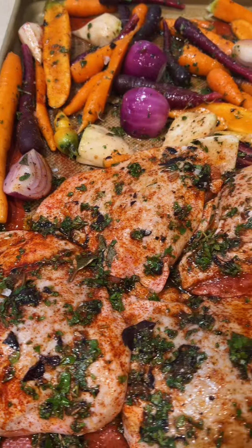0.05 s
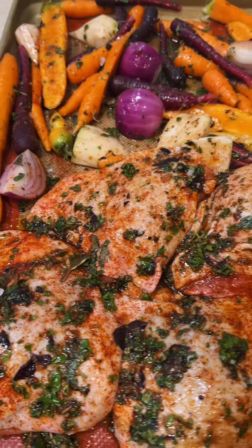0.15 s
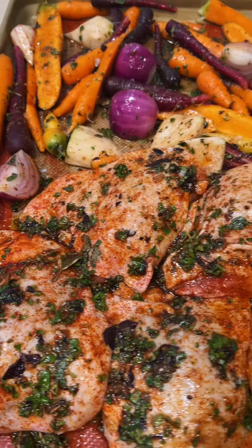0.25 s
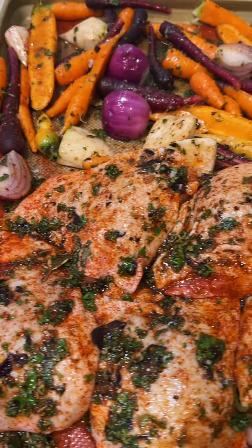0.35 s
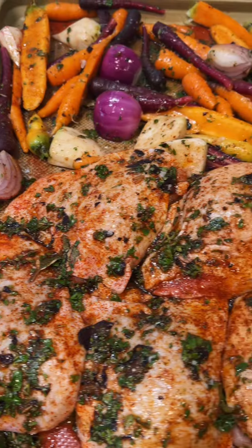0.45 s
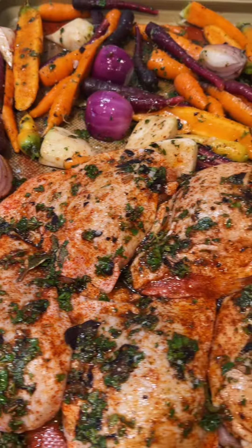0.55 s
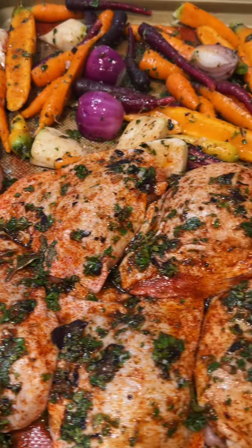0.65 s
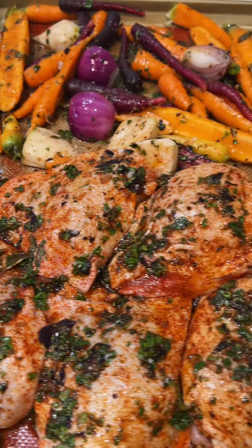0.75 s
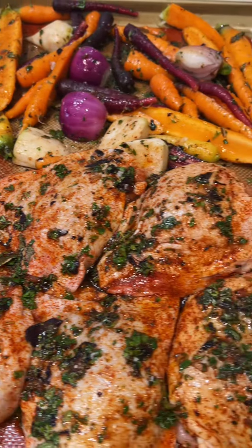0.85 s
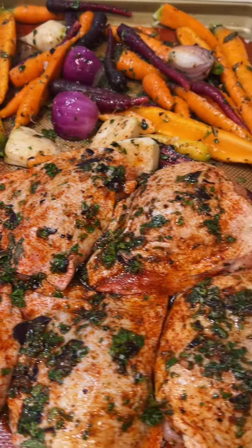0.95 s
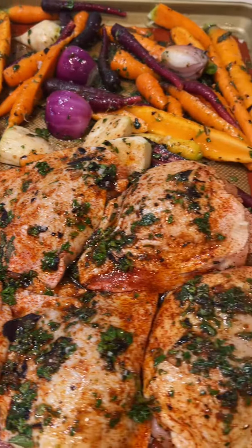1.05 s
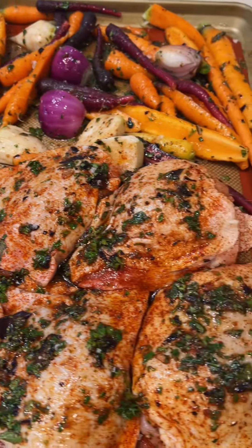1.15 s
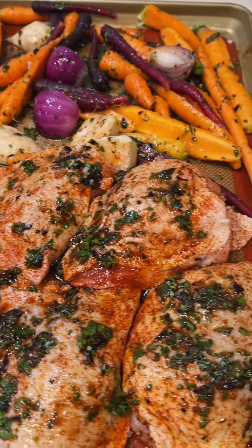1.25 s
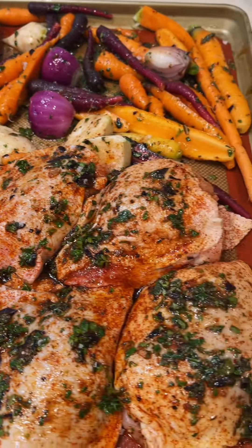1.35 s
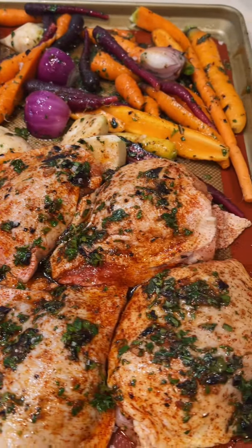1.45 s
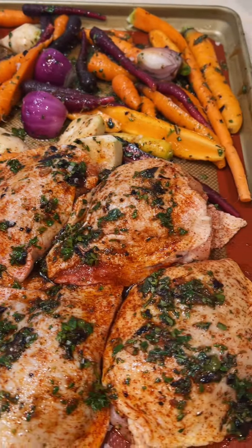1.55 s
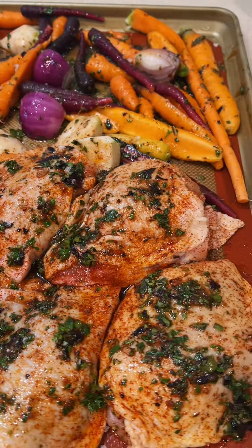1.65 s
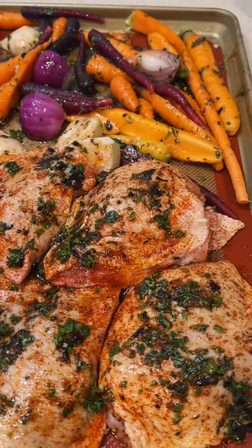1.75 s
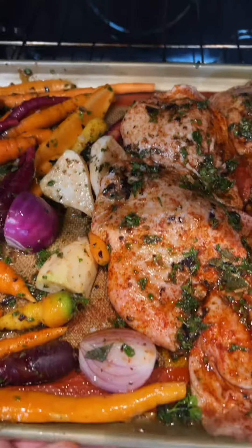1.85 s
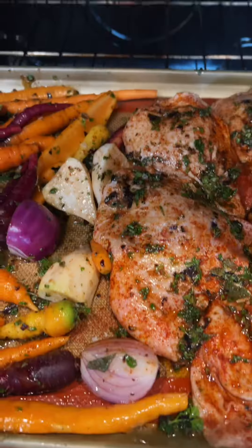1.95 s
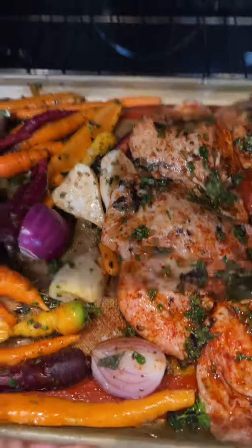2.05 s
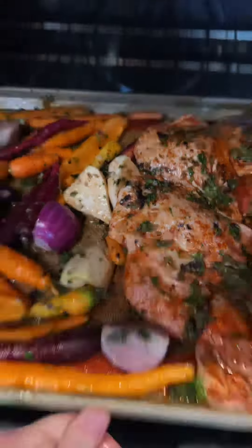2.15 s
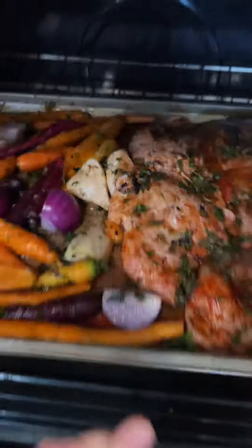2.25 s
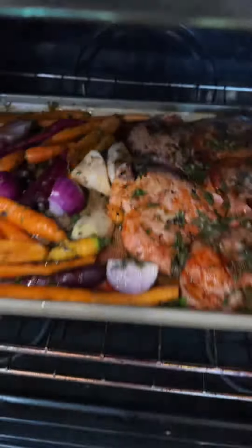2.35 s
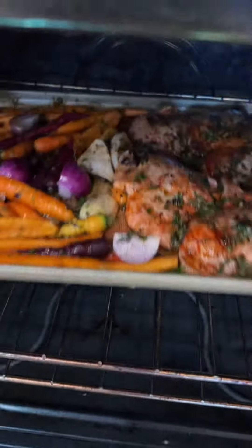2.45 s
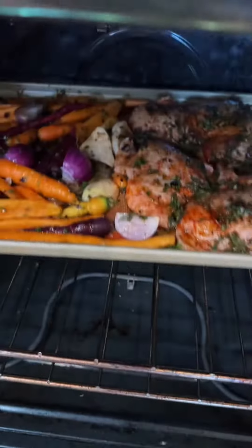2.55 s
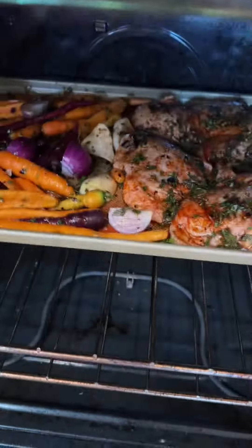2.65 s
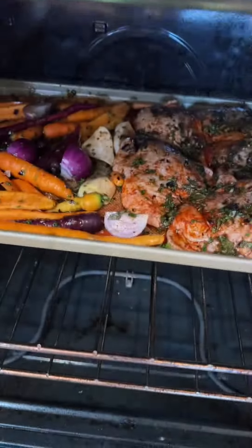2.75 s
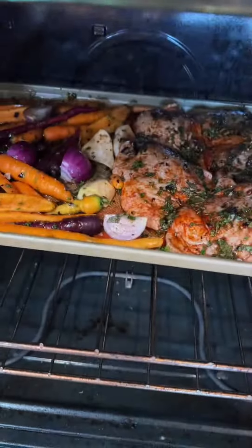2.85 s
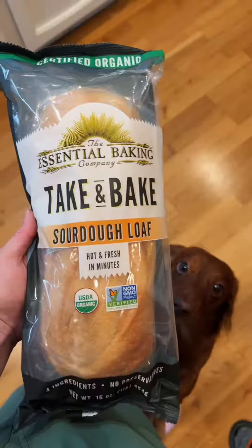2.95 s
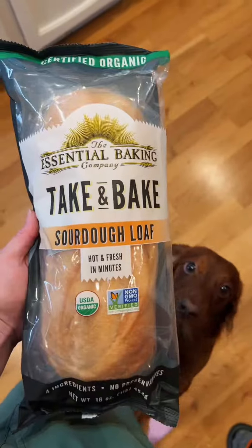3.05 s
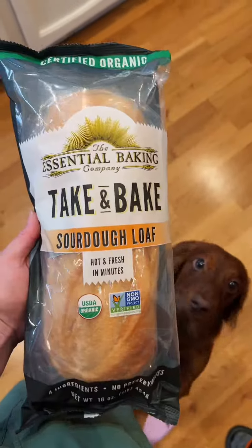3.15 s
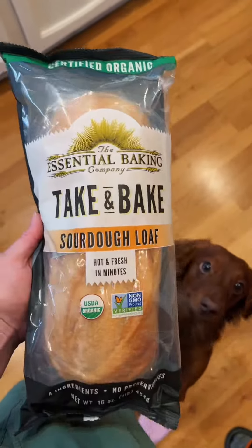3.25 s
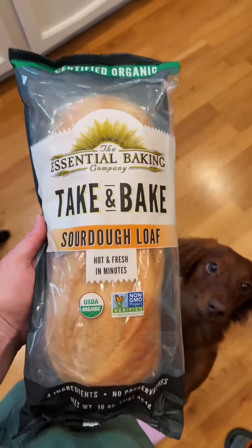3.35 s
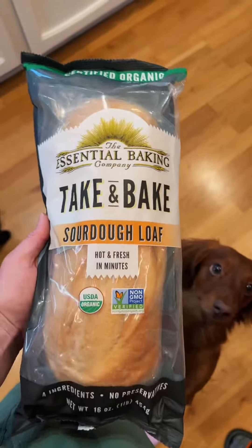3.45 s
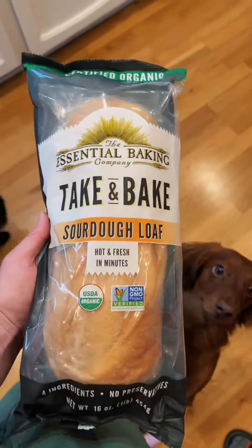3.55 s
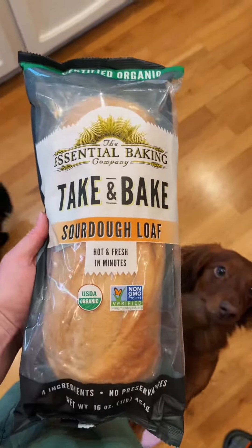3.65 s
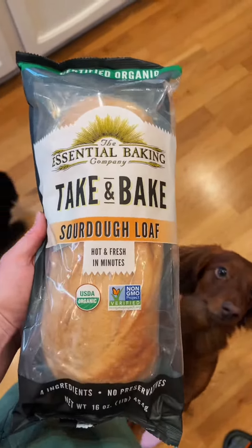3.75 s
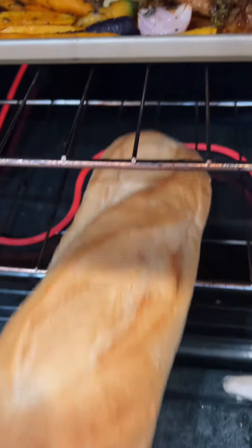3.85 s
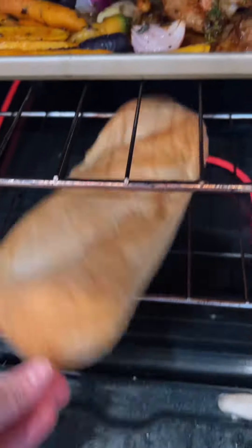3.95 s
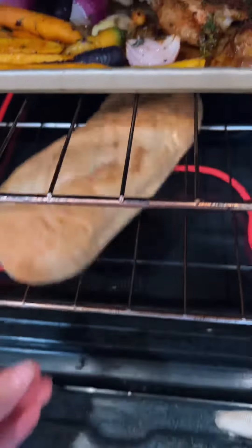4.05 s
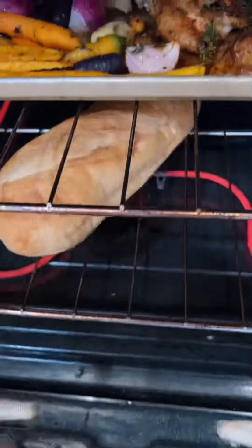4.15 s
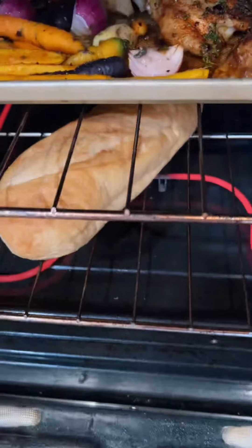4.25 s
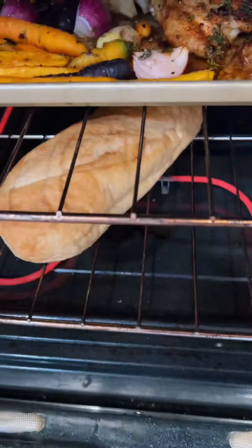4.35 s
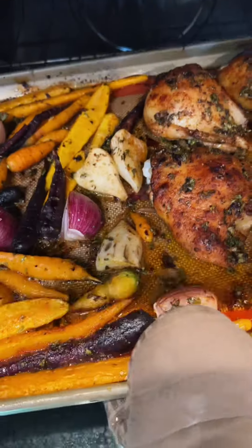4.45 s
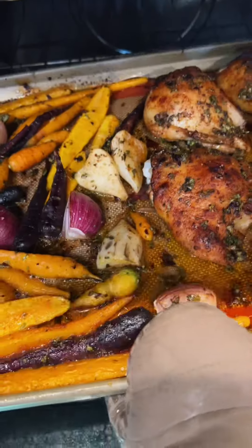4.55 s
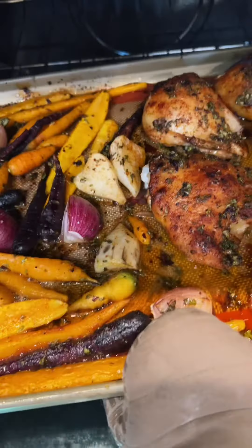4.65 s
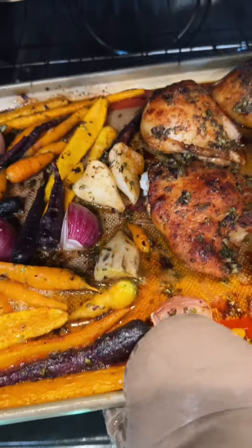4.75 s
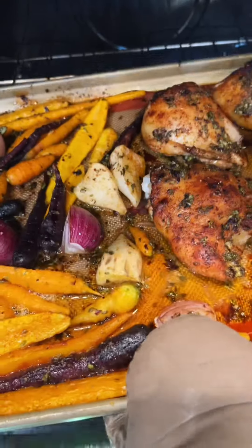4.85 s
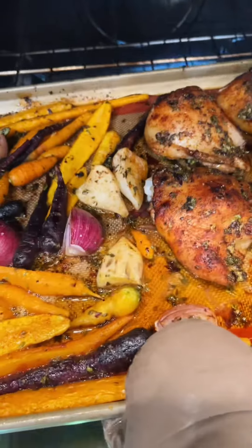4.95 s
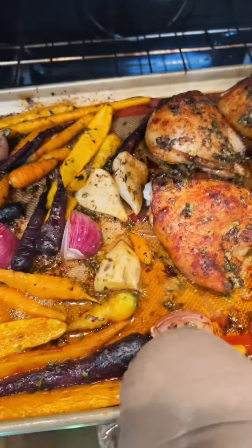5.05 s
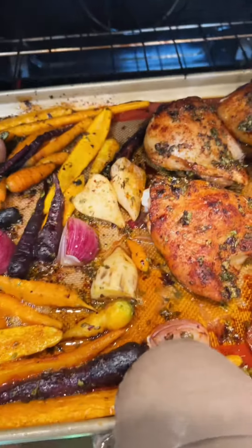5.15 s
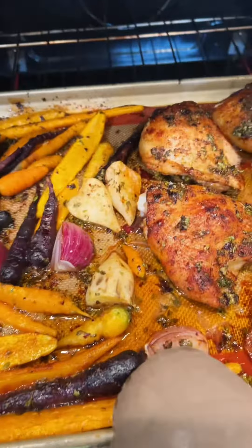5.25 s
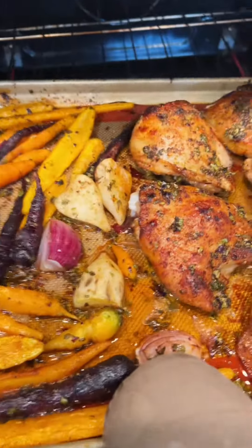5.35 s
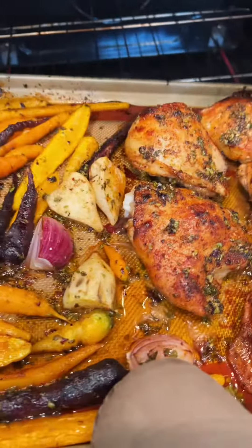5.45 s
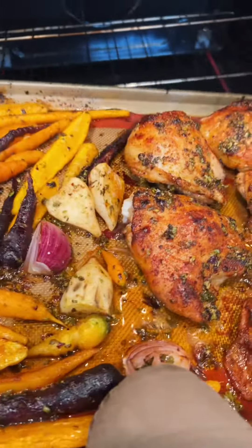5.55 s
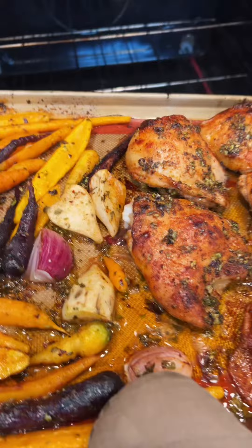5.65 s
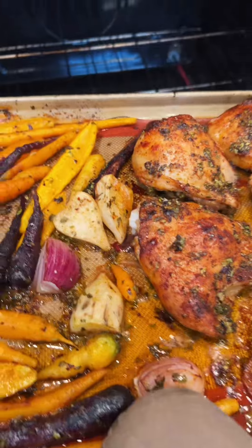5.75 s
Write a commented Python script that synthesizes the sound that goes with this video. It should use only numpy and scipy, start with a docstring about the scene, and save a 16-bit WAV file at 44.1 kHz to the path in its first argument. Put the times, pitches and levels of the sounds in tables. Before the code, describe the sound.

Five short home-kitchen shots, cut hard with small silences. From 0 to 1.77 s a very quiet low appliance hum and soft fan rush grow slightly nearer, with faint dry handling ticks around 0.6, 0.85 and 1.6 s. From 1.96 to 2.9 s room air jumps up: a loaded sheet pan grinds along oven wires, knocks at 2.18, then bangs hardest in a cluster at 2.48-2.75, with boxy steel ring, low thumps and a closing scrape. From 3.1 to 3.8 s a plastic bag gives one soft swish, then faint finger rubbing. From 3.83 to 4.39 s a small squeak leads into a rapid bright wire-rack clatter, loudest near 3.93-4.0, over hissing fat. From 4.56 to 5.8 s steady bubbling sizzle continues while the rack drags out, rumbling, with jerks and metallic squeaks at 5.0-5.4, then sputters and thin steam whistles until the abrupt end.

```python
"""A home kitchen in five short shots with silence between. An appliance hums; a loaded sheet pan grinds onto
the oven rack and knocks home; a plastic bread bag swishes; the wire rack clanks in a quick run over sizzling
fat; the rack with the hot pan is dragged out in squeaky jerks. Hum and modes are sines; friction, fat and
plastic film are coloured noise or random impulses; the steel oven box adds a dense, decaying noise ring."""
import sys
import numpy as np
from scipy import signal
from scipy.fft import rfft, irfft
from scipy.io import wavfile
from scipy.ndimage import uniform_filter1d

SR = 44100
rng = np.random.default_rng(int(sys.argv[2]) if len(sys.argv) > 2 else 0)


def dump(signal):
    """Clip the signal to [-1, 1] and save it as 16-bit WAV at the path in sys.argv[1]."""
    limited = np.clip(np.atleast_2d(signal).T, -1, 1)
    pcm = np.round(limited * 32767).astype(np.int16)
    wavfile.write(sys.argv[1], SR, pcm)


N = 255339
T = np.arange(N) / SR


def amp(db):
    """Decibels to gain."""
    return 10 ** (np.asarray(db) / 20)


def read(points, hz):
    """Interpolates a (frequency, value) table on a log-frequency axis."""
    f, value = np.transpose(points)
    return np.interp(np.log(hz + 1), np.log(f + 1), value)


def add(mix, s, sound):
    """Lays a sound into the mix at time s."""
    part = mix[max(round(s * SR), 0):][:len(sound)]
    part += sound[:len(part)]


def colour(x, spectrum, tilt_db_per_oct=0, peak_hz=1000, peak_db=0):
    """Gives white input a tilted spectrum at the same power, then one resonance on top."""
    hz = np.fft.rfftfreq(len(x), 1 / SR)
    gain = amp(read(spectrum, hz) + tilt_db_per_oct * np.log2(np.maximum(hz, 100)))
    gain = gain / np.sqrt(np.mean(gain ** 2))
    resonance = 1 + (amp(peak_db) - 1) / (1 + 1j * (hz - peak_hz) / (0.053 * peak_hz))
    return irfft(rfft(x) * resonance * gain, len(x))


def drift(per_s):
    """Slow random curve through unit-variance knots."""
    knots = np.arange(0, T[-1] + 1, 1 / per_s)
    return np.interp(T, knots, rng.standard_normal(len(knots)))


def grains(per_s, spread_db):
    """Random impulses of either sign and exponentially spread dB size; unit power."""
    size = amp(spread_db * np.minimum(rng.exponential(1, N), 4))
    x = size * rng.choice([-1., 1.], N) * (rng.random(N) < per_s / SR)
    return x / x.std()


# Ring of the steel oven box: (frequency [Hz], t60 [s])
OVEN_T60 = [(80, 0.6), (300, 0.34), (1000, 0.48), (3000, 0.25), (7000, 0.22), (15000, 0.22)]


def dense_ring(t, hold_s):
    """Countless close modes of the oven box in uneven clusters: fed for hold_s, then dying by band."""
    hz, at, z = signal.stft(rng.standard_normal(len(t)), SR, nperseg=256)
    clusters = uniform_filter1d(rng.standard_normal(z.shape), size=24, axis=1, mode="wrap")
    clusters = np.clip(clusters / clusters.std(), -2, 1.5)
    lumps = amp(4 * clusters * np.minimum(hz / 1000, 1)[:, None])
    lumps = lumps / np.sqrt(np.mean(lumps ** 2))
    decay = np.exp(-np.log(1000) * np.maximum(at - hold_s, 0) / read(OVEN_T60, hz)[:, None])
    return signal.istft(z * lumps * decay, SR, nperseg=256)[1][:len(t)]


def in_oven(x, wet_db):
    """Adds the oven box's ring, rescaled to about the same power."""
    tail = dense_ring(T[:SR], 0)
    wet = signal.fftconvolve(x, tail / np.linalg.norm(tail))[:N]
    return (x + amp(wet_db) * wet) / np.hypot(1, amp(wet_db))


def ring(modes, build_s, tilt_db_per_oct=0):
    """Clear modes of one object: build up as the blow spreads; a hard contact favours the high ones."""
    t = T[:SR]
    waves = np.zeros(SR)
    for k, (hz, db, t60_s) in enumerate(modes):
        gain = (-1) ** k * amp(db + tilt_db_per_oct * np.log2(hz / 700))
        waves += gain * np.exp(-np.log(1000) * t / t60_s) * np.sin(2 * np.pi * hz * t)
    return waves * (1 - np.exp(-t / build_s))


def strokes(rows, sag_db_per_s, release_s):
    """Movements build up, lose force and die away; one gain curve for each level column."""
    gains = 0
    for start, length, rise, *levels_db in rows:
        t = T - start
        held = np.clip(t / rise, 0, 1) * amp(-sag_db_per_s * np.maximum(t - rise, 0))
        release = np.exp(-np.maximum(t - length, 0) / release_s)
        gains = np.hypot(gains, amp(levels_db)[:, None] * held * release)
    return gains


def chirps(rows, waver, wet_db):
    """Short gliding tones that stutter in strength and waver in pitch."""
    out = np.zeros(N)
    for s, length, hz, glide, db in rows:
        u = np.linspace(0, 1, round(length * SR))
        pitch_hz = hz * (1 + glide * (u - .5) + waver * drift(per_s=1500)[:len(u)])
        stutter = 1 + .7 * drift(per_s=500)[:len(u)]
        tone = np.sin(2 * np.pi * np.cumsum(pitch_hz) / SR)
        add(out, s, amp(db) * 2 * stutter * np.sin(np.pi * u) * tone)
    return in_oven(out, wet_db)


# Room air: (frequency [Hz], relative density [dB per Hz])
AIR_SPECTRUM = [(20, -36.5), (35, -18), (60, 3.5), (85, -4), (140, -1.5), (200, -4), (270, -8.5), (350, -5),
                (450, -14.5), (720, -14), (1000, -19.5), (2000, -21.5), (4500, -30.5), (8000, -43),
                (15500, -56)]


def room_air():
    """Coloured noise of the room, its level drifting slightly."""
    return colour(rng.standard_normal(N), AIR_SPECTRUM) * amp(0.45 * drift(per_s=33))


# Motor lines: (frequency [Hz], relative level [dB])
MOTOR_LINES = [(59.1, -52), (118.6, -78), (197, -70.5), (246.3, -68), (295.6, -67.5), (370.8, -71),
               (473.7, -76.5), (739, -77.5)]
# Fan rush: (frequency [Hz], relative density [dB per Hz])
FAN_SPECTRUM = [(25, -9), (45, -4), (65, 3.5), (100, 1), (145, 3), (180, -10.5), (330, -3), (520, -14),
                (900, -13.5), (1400, -22), (2100, -23), (3200, -32.5), (5000, -38), (7000, -40.5),
                (12000, -52.5), (15500, -48)]
# Approach at a steady dB rate
FAR_DB, APPROACH_DB_PER_S = -1.1, 3


def appliance():
    """Motor hum with overtones wavering in level and phase, plus fan noise; first shot only."""
    lines = np.zeros(N)
    for hz, db in MOTOR_LINES:
        level = amp(db + 3.3 * drift(per_s=9.0))
        wavering_s = T + 0.00037 * drift(per_s=5.33)
        lines += level * np.sin(2 * np.pi * hz * wavering_s)
    fan = amp(-55 + 1.0 * drift(per_s=15.0)) * colour(rng.standard_normal(N), FAN_SPECTRUM)
    nearness = amp(FAR_DB + APPROACH_DB_PER_S * T) * (T < SHOTS[1][0])
    return nearness * (np.sqrt(2) * lines + fan)


# Handling ticks: (time [s], level [dB], decay constant [s])
TICK_ROWS = [(.619, -61, .002), (0.676, -73, 0.039), (.845, -71, 0.027), (1.625, -68, .012)]
# Bright hiss, also of spray and sliding: (frequency [Hz], relative density [dB per Hz])
HISS_SPECTRUM = [(800, -20), (2500, 0), (4000, .5), (6000, -1), (9000, 0), (12000, -3), (15000, -.5)]


def ticks():
    """Faint, bright, dry ticks of handling: decaying noise bursts."""
    out, t = np.zeros(N), T[:SR // 4]
    for s, db, decay_s in TICK_ROWS:
        add(out, s, amp(db) * colour(rng.standard_normal(len(t)), HISS_SPECTRUM) * np.exp(-t / decay_s))
    return out


# Hand shifts on the bag: (time [s], length [s], rise [s], swish level [dB], rubbing level [dB])
BAG_SHIFTS = [(3.1, 0.098, 0.025, -56, -65), (3.29, 0.12, 0.11, -69, -74), (3.405, .015, .012, -69, -56.5),
              (3.45, .37, .28, -75.5, -61)]
# Creasing film: (frequency [Hz], relative density [dB per Hz])
CREASE_SPECTRUM = [(400, -18), (1200, -12.5), (2500, -0.5), (4200, 1.5), (6000, -5), (8500, -9),
                   (11000, -21.5), (15500, -27)]
# Fingers on the film: (frequency [Hz], relative density [dB per Hz])
RUBBING_SPECTRUM = [(300, 1), (800, 3.5), (1500, 6), (2600, 0), (3600, -19), (6000, -23), (7700, -9.5),
                    (11000, -36.5)]


def bag():
    """Fine creases of plastic film as impulses; fingers rubbing over it as noise."""
    crease, rub = strokes(BAG_SHIFTS, sag_db_per_s=24.5, release_s=.04)
    swish = crease * colour(grains(per_s=21000, spread_db=3.5), CREASE_SPECTRUM)
    return swish + rub * colour(rng.standard_normal(N), RUBBING_SPECTRUM)


# Fat sizzling: (time [s], length [s], rise [s], sizzle level [dB], spray level [dB])
SIZZLE_STROKES = [(3.8, .6, 0.061, -59, -57.5), (4.25, 1.55, 0.52, -54, -65)]
# Bubbles: (frequency [Hz], relative density [dB per Hz])
BUBBLE_SPECTRUM = [(300, -8), (900, -3.5), (1900, 0), (3200, 1.5), (4300, -3.5), (6000, -2.5), (8200, -5.5),
                   (10000, -11), (12500, -22), (15500, -17.5)]


def sizzle():
    """Thousands of bursting fat bubbles and finer spray, blurred by the oven box."""
    boil, mist = strokes(SIZZLE_STROKES, sag_db_per_s=0.0, release_s=.01)
    bubbles = boil * colour(grains(per_s=2200, spread_db=-0.5), BUBBLE_SPECTRUM)
    spray = mist * colour(grains(per_s=12000, spread_db=5.0), HISS_SPECTRUM)
    return in_oven(bubbles, wet_db=-1.5) + in_oven(spray, wet_db=-10.5)


def spits(start_s, end_s, count):
    """Faint, brief sputters of steam at random times, blending into the sizzle."""
    # time [s], length [s], pitch [Hz], glide [share], relative level [dB]
    low, high = (start_s, .006, 5200, -.15, -72), (end_s, .025, 8300, .1, -61)
    return chirps(rng.uniform(low, high, (count, 5)), waver=0.057, wet_db=-10)


# Steam whistles: (time [s], length [s], pitch [Hz], glide [share], relative level [dB])
WHISTLE_ROWS = [(5.28, 0.054, 8200, -0.027, -55.5), (5.46, 0.0356, 6960, -0.067, -54.5),
                (5.555, 0.023, 8180, -0.042, -48.5), (5.575, 0.034, 7570, -0.112, -62),
                (5.7, 0.07, 8050, -0.057, -60.5)]


def whistles():
    """Thin gliding whistles of steam from the fat."""
    return chirps(WHISTLE_ROWS, waver=0.049, wet_db=5)


# Metal squeaks: (time [s], length [s], pitch [Hz], glide [share], relative level [dB])
SQUEAK_ROWS = [(3.835, 0.05, 780, 0.16, -57), (3.895, 0.06, 846, 0, -50.5),
               (5.128, 0.038, 1673, 0.0084, -48.5), (5.195, 0.029, 1696, -0.03, -39.5),
               (5.33, 0.038, 2670, -0.027, -44), (5.365, 0.049, 923.6, -.07, -43.5)]


def squeaks():
    """Gliding squeaks of metal on wire."""
    return chirps(SQUEAK_ROWS, waver=0.036, wet_db=-4.0)


# Bass of rumble and thumps: (frequency [Hz], relative density [dB per Hz])
THUMP_SPECTRUM = [(30, -35.5), (48, -12), (68, 0), (130, 1), (200, -3.5), (300, -8), (600, -30),
                  (2000, -72.5)]


def slide(stroke, grind, modes, grind_db, ring_db, rumble_db, hiss_db):
    """Stick-slip on the wires: coarse slips grind and ring the modes, fine ones hiss, the rack rumbles."""
    force, weight, rub = stroke
    slips = force * grains(per_s=2000, spread_db=1.0) * amp(2.0 * drift(per_s=90))
    body = ring(modes, build_s=0.0024)
    ringing = signal.fftconvolve(slips, body / np.linalg.norm(body))[:N]
    grinding = in_oven(colour(slips, grind), wet_db=-3.5)
    rumble = weight * colour(rng.standard_normal(N), THUMP_SPECTRUM)
    hiss = rub * colour(in_oven(grains(per_s=13000, spread_db=4.0), wet_db=-5.0), HISS_SPECTRUM)
    friction = amp(grind_db) * grinding + amp(ring_db) * ringing
    return friction + amp(rumble_db) * rumble + amp(hiss_db) * hiss


# Modes of the loaded pan: (frequency [Hz], relative level [dB], t60 [s])
PAN_MODES = [(119.7, -7.5, .5), (140, -17.5, 0.34), (203.1, -3, 0.74), (337, -4, 0.35), (461, -14.5, 1),
             (667, -11.5, 0.14), (728, -11.5, .22), (825, -10, 0.38), (894, -12, 0.11), (1418, -7.5, 0.16),
             (1685, -16, 0.23), (2240, -14, 0.24), (2880, -23, 0.28), (4170, -19, 0.25), (4940, -22, 0.24),
             (6100, -4, 0.063)]
# Shoves inwards: (time [s], length [s], rise [s], relative grinding, rumble, hiss levels [dB])
PUSH_STROKES = [(1.9, 0.57, 0.35, -45, -43.5, -45), (2.03, 0.17, 0.088, -37, -48, -72),
                (2.17, 0.092, 0.045, -60.5, -52, -51), (2.43, 0.05, 0.031, -40.5, -57, -41),
                (2.48, .2, .01, -59.5, -48, -58.5), (2.675, .24, 0.0102, -48, -40, -38.5),
                (4.29, 0.12, 0.067, -63.5, -59, -56)]
# Grinding inwards: (frequency [Hz], relative density [dB per Hz])
PUSH_SPECTRUM = [(150, -24), (400, 2.5), (600, -2), (780, 9), (1020, -4), (1320, -0.5), (2200, 1.5),
                 (3300, -6.5), (5000, -14), (8000, -13), (15000, -39)]


def push_in():
    """Shoves slide the load in; slips excite the pan."""
    shoves = strokes(PUSH_STROKES, sag_db_per_s=32, release_s=0.012)
    return slide(shoves, PUSH_SPECTRUM, PAN_MODES, grind_db=-2.5, ring_db=-24.0, rumble_db=-0.5, hiss_db=2)


# Modes of the side runners carrying the rack: (frequency [Hz], relative level [dB], t60 [s])
RUNNER_MODES = [(253, -3, 1), (368, -13, 1), (654, -2, 0.68), (894, -3, 0.24), (978, -2.5, 0.85),
                (997, -10, 1), (1680, -5, 0.093), (2720, 11, 0.043), (1940, -7, 0.48), (2050, -20.5, 0.73),
                (2183, -1, 0.45), (3000, -6, .4)]
# Drag and three jerks: (time [s], length [s], rise [s], relative grinding, rumble, hiss levels [dB])
PULL_STROKES = [(4.6, 1.105, 0.76, -52, -51, -81), (5.005, .17, 0.0083, -47, -45, -78),
                (5.19, 0.082, 0.02, -39.5, -39, -70), (5.32, 0.053, 0.025, -36.5, -43, -62)]
# Grinding outwards: (frequency [Hz], relative density [dB per Hz])
PULL_SPECTRUM = [(150, -14), (400, -0.5), (550, -6.5), (900, -7), (1350, -12.5), (1700, -4.5), (2700, -8),
                 (4000, -15), (6500, -22), (10000, -36), (15000, -61)]


def pull_out():
    """A long drag and three jerks pull the rack out; slips excite the side runners."""
    drag = strokes(PULL_STROKES, sag_db_per_s=13.5, release_s=0.037)
    return slide(drag, PULL_SPECTRUM, RUNNER_MODES, grind_db=-1, ring_db=-5.0, rumble_db=-1.5, hiss_db=0)


# Clatter: (frequency [Hz], relative density [dB per Hz])
CLATTER_SPECTRUM = [(100, -17.5), (250, 0), (540, 1), (780, 2), (1300, -2.5), (2100, -1.5), (2650, -6),
                    (3400, -4), (5000, -10.5), (7000, -11.5), (9500, -18.5), (12000, -31), (15500, -26)]
RING_TILT_SHARE = 0.18  # share of a blow's brightness reaching the modes


def knocks(rows, struck, neighbour, neighbour_db, build_s, rattle_s):
    """Blows crack, rattle loose wires, thump the oven floor, ring the struck object and its neighbour."""
    out, t = np.zeros(N), T[:SR]
    for s, clatter_db, bright_db_per_oct, thump_db, ring_db, spot_hz, spot_db in rows:
        bounces = amp(2 * drift(per_s=480)[:SR] * np.exp(-t / 0.054))
        clatter = colour(dense_ring(t, rattle_s), CLATTER_SPECTRUM, bright_db_per_oct, spot_hz, spot_db)
        clatter *= bounces * (1 - np.exp(-t / 0.00068))
        crack = colour(rng.standard_normal(SR), CLATTER_SPECTRUM, tilt_db_per_oct=1.3)
        crack *= amp(-5.5) * np.exp(-t / 0.0083)
        # bass swells later
        thump = colour(dense_ring(t, rattle_s), THUMP_SPECTRUM) * (1 - np.exp(-t / 0.0093))
        ring_tilt = RING_TILT_SHARE * bright_db_per_oct
        own = ring(struck, build_s, ring_tilt)
        passed_on = amp(neighbour_db) * ring(neighbour, build_s, ring_tilt)
        shot_end = min(shot[1] for shot in SHOTS if shot[1] > s)
        in_shot = s + t < shot_end + .02
        blow = amp(clatter_db) * (clatter + crack + passed_on) + amp(thump_db) * thump + amp(ring_db) * own
        add(out, s, in_shot * blow)
    return out


# Modes of the wire rack: (frequency [Hz], relative level [dB], t60 [s])
RACK_MODES = [(190, 1, 0.27), (222, 0, 0.56), (228.8, -10, 1.8), (265, -13.5, 2.2), (331, -13, 1),
              (389, -9.5, 0.3), (486.4, -15.5, 0.89), (619, -13.5, 1.8), (682, -7.5, 0.64), (760, -7, 0.38),
              (840, -9.5, 0.44), (869, -7.5, 0.52), (885, -11, 0.29), (1140, -21.5, 0.29), (1285, -4, 0.39),
              (1403, -6.5, 0.27), (1928, -10, 0.32), (2050, -13, 0.21), (3108, -6, 0.43), (3225, -7, 0.34),
              (3240, -14, .18), (3740, -13.5, 0.18), (3600, -14, 0.19), (5070, -16, .25)]
# Pan on rack: (time [s], relative clatter level [dB], brightness [dB per octave], relative thump level [dB],
# relative ring level [dB], struck-spot resonance [Hz], its height [dB])
PAN_BLOWS = [(1.975, -56.5, -1.5, -45.5, -68, 850, 9), (2.176, -41, -0.5, -42, -50, 1290, 8),
             (2.478, -31, 4, -36.5, -27, 784, 10.5), (2.503, -41, -4, -31.5, -30.5, 367, 17.5),
             (2.5636, -31.5, 2, -34.5, -34, 1610, 9), (2.643, -38, 0.5, -36, -41, 806, 10.5),
             (2.686, -41.5, 3.5, -42.5, -42, 2150, 6), (2.752, -41.5, -1.5, -48, -49, 3000, 1),
             (4.864, -56, 0, -43, -50.5, 413, 21), (5.018, -42, -2, -46.5, -59, 1720, 9.5),
             (5.222, -40.5, -3.5, -42, -41.5, 1020, 13.5)]


def pan_knocks():
    """The pan knocks on the rack: pan modes lead, rack modes follow."""
    return knocks(PAN_BLOWS, PAN_MODES, RACK_MODES, neighbour_db=-10, build_s=0.0029, rattle_s=0.0045)


# Rack blows: (time [s], relative clatter level [dB], brightness [dB per octave], relative thump level [dB],
# relative ring level [dB], struck-spot resonance [Hz], its height [dB])
RACK_BLOWS = [(3.931, -30, 2, -29, -34.5, 1290, 5), (3.984, -25.5, 1, -41, -32.5, 3340, 6),
              (4.006, -30, -2, -27.5, -38.5, 900, 2), (4.045, -37, 0.5, -44, -45, 850, 3),
              (4.12, -39.5, -2, -56, -45, 870, 1), (4.183, -45.5, -1.5, -43, -59, 1830, 0.5),
              (5.272, -49, -3.5, -38.5, -40.5, 1650, 8)]


def rack_clanks():
    """The wire rack clanks: rack modes lead, pan modes follow."""
    return knocks(RACK_BLOWS, RACK_MODES, PAN_MODES, neighbour_db=-17, build_s=0.0035, rattle_s=0.0082)


# Shots: (start [s], end [s], fade-in [s], room air level [dB])
SHOTS = [(0, 1.768, .005, -75), (1.964, 2.904, .012, -56), (3.107, 3.81, .022, -57),
         (3.827, 4.39, .012, -53), (4.558, 5.8, .085, -54)]


def scene():
    """All sources over the room air, heard shot by shot with silence between."""
    sound = appliance() + ticks() + bag()
    sound += sizzle() + spits(5.1, 5.76, count=70) + whistles() + squeaks()
    sound += push_in() + pull_out() + pan_knocks() + rack_clanks()
    air = room_air()
    out = np.zeros(N)
    for start, end, fade_s, air_db in SHOTS:
        fade_in = amp(-16 * np.clip(1 - (T - start) / fade_s, 0, 1))
        gate = np.clip((T - start) / .002, 0, 1) * np.exp(-np.maximum(T - end, 0) / .0015)
        out += gate * fade_in * (sound + amp(air_db) * air)
    return out[None]


EDGE_HZ = 15900


def record(dry):
    """The recorder's band limit: a linear-phase low-pass."""
    low_pass = signal.firwin(511, EDGE_HZ, window=("kaiser", 9), fs=SR)
    return signal.oaconvolve(dry, low_pass[None], "same")


dry = scene()
out = record(dry)
dump(out)
```